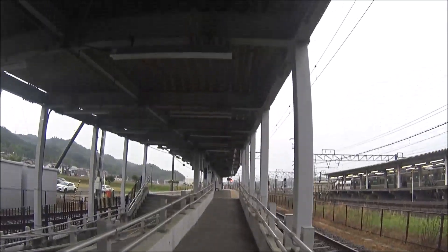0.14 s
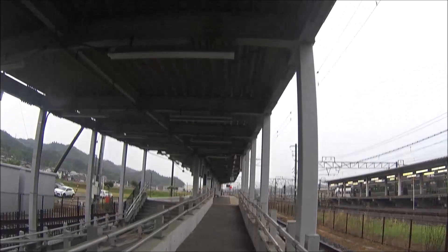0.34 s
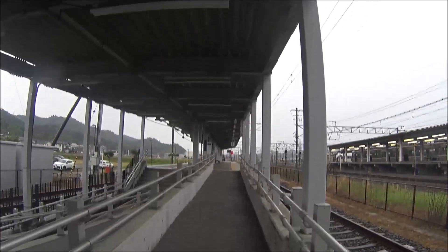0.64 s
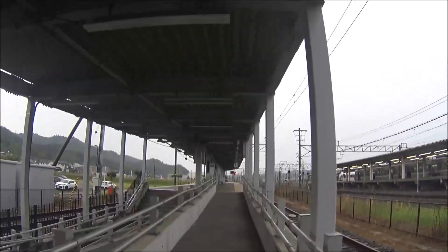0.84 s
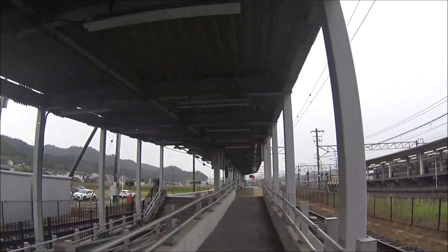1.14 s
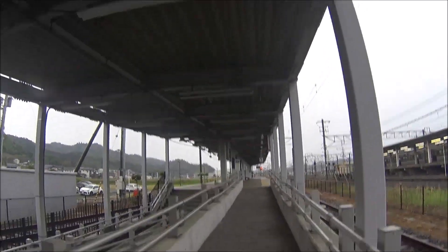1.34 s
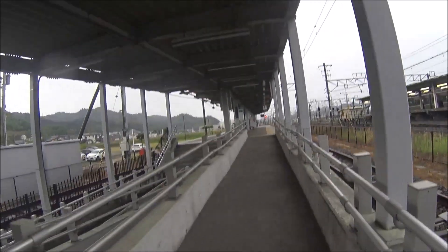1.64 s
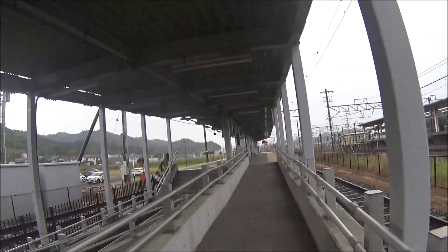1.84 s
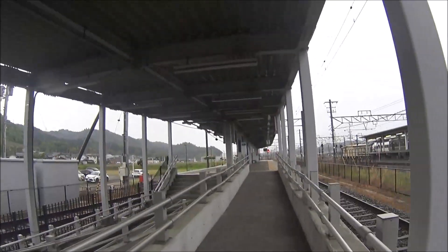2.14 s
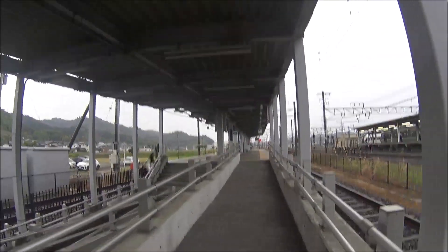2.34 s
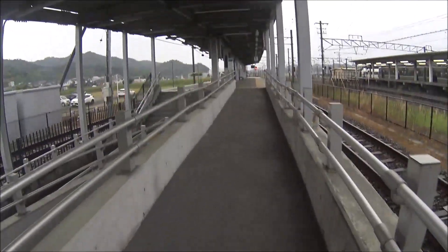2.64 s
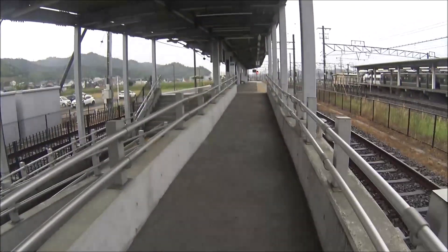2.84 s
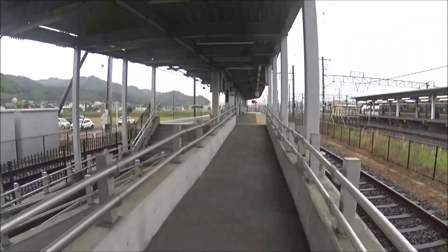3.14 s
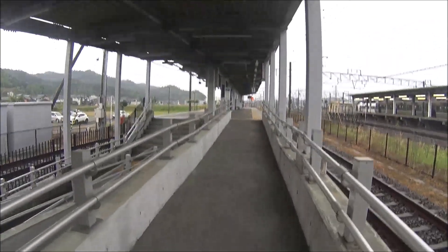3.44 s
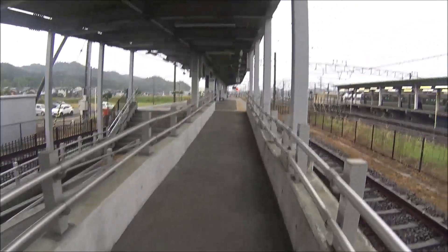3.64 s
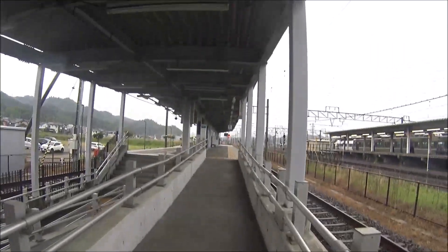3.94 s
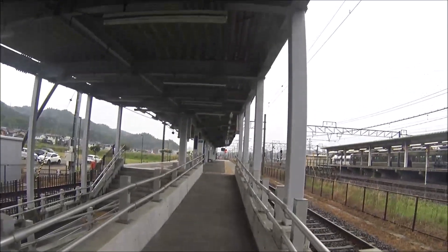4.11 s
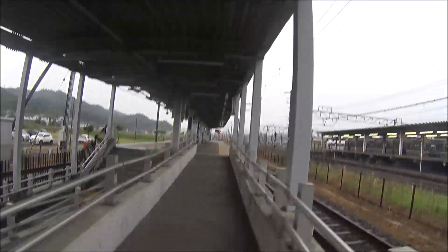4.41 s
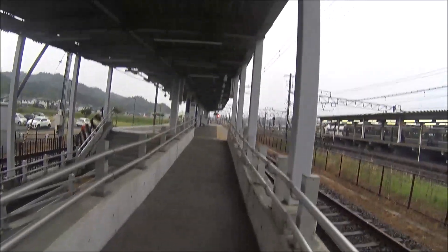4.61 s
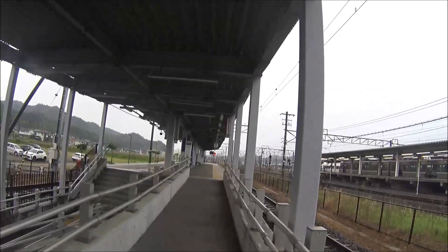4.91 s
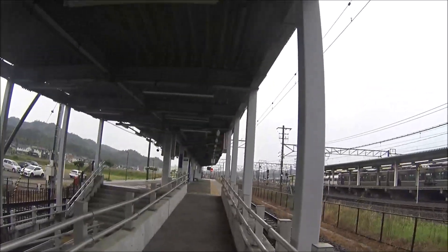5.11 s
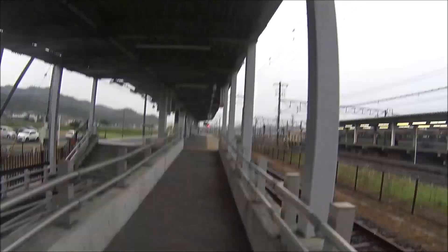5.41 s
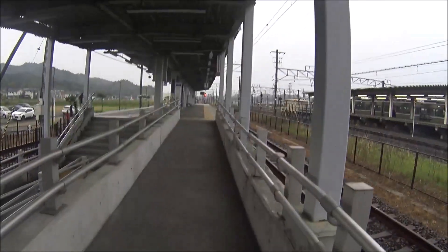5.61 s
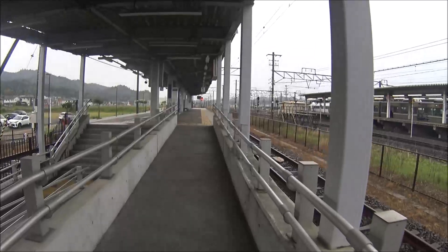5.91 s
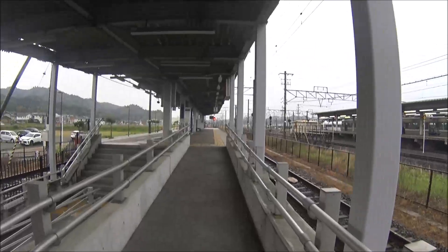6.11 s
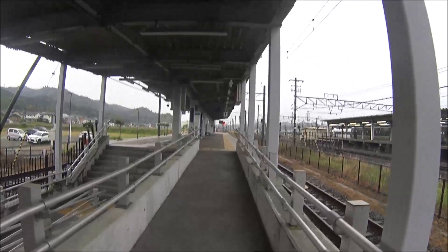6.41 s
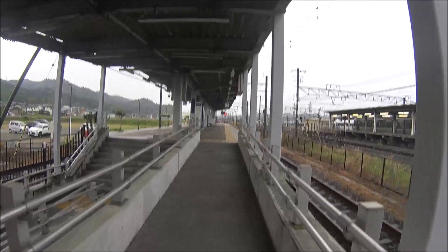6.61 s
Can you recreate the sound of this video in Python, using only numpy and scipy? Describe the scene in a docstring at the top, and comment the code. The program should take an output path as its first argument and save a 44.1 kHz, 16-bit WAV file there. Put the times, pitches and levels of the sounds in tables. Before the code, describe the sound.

A wheelchair rolls without stopping for almost seven seconds along a concrete ramp under a station roof, heard from a small camera riding on it. Close tyre hiss, grainy and slightly hollow, runs throughout, dipping a little near 2 s and a bit stronger from about 3 s. Beneath it is shuddering low rumble, modest at first, swelling from 3 s to its roughest around 3.5 to 4.5 s, then easing unevenly and rising slightly at the end. Faint, very short falling bird chips with a light roof echo come mostly between 0.6 and 2.7 s, then singly near 4.7, 5.7 and 6.3 s. A deep thud and tick fall at 1.7 s, hollow knocks cluster at 2.5 to 2.7, several between 3.1 and 4.5, again around 5.5 and at 6.6 s. Loose fittings tick at 3.6 to 4.5 s, sharpest on the right near 4.5, and again around 5.7, 6.0 and 6.7 s.

```python
"""Wheelchair on a platform ramp

Under a platform roof, a wheelchair rolls over concrete with a small camera and its two microphones aboard.
Tyres close by hiss over fine grit: grainy noise lifted by the resonances of the camera's housing.
Rough paving makes the frame rumble in shuddering low noise; wheels knock over bumps as struck modes and thuds.
Loose fittings tick with short rings, and a small bird chips faintly in quick falling sweeps with a roof echo."""
import sys
import numpy as np
from scipy import signal
from scipy.fft import rfft, irfft
from scipy.io import wavfile

SR = 44100
rng = np.random.default_rng(int(sys.argv[2]) if len(sys.argv) > 2 else 0)


def materialize(psi):
    """Save the field psi as 16-bit PCM at rate SR to the path in sys.argv[1].

    A 1-D psi becomes a single channel; in a 2-D psi each row is a channel.
    """
    bounded = np.clip(np.atleast_2d(psi).T, -1, 1)
    quanta = np.round(bounded * 32767).astype(np.int16)
    wavfile.write(sys.argv[1], SR, quanta)


N = 298116
TIME = np.arange(N) / SR
FREQ = np.maximum(np.arange(N // 2 + 1) * SR / N, 1)  # Hz, kept off zero for the logarithms
RING_TIME = TIME[:SR // 4]  # time axis of one struck sound, s


def undb(db):
    """Decibels to gain."""
    return 10 ** (np.asarray(db) / 20)


def unit(x):
    """Scale to rms 1."""
    return x / np.sqrt(np.mean(x ** 2))


def curves(table):
    """The columns of a table as controls over time, straight between rows."""
    seconds, *columns = np.transpose(table)
    return [np.interp(TIME, seconds, column) for column in columns]


def spectrum(points):
    """dB at every frequency, straight between points on a log axis."""
    hz, db = np.transpose(points)
    return np.interp(np.log(FREQ), np.log(hz), db)


def colour(x, db):
    """Filter by a dB value for every frequency."""
    return irfft(rfft(x) * undb(db), N)


def above(x, hz):
    """The part of a sound that lies above hz, with a smooth crossover."""
    return irfft(rfft(x) / (1 + (hz / FREQ) ** 6), N)


def walk(rate):
    """Smooth random drift of spread 1, up to about rate changes a second."""
    noise = rfft(rng.standard_normal(N))
    return unit(irfft(noise * np.exp(-(FREQ / rate) ** 2), N))


def decay(t60):
    """Exponential dying away by 60 dB in t60 seconds."""
    return np.exp(-np.log(1000) * RING_TIME / max(t60, 1 / SR))


def ring(hz, t60):
    """One struck mode: a decaying sine."""
    return np.sin(2 * np.pi * hz * RING_TIME) * decay(t60)


def add(track, s, sound):
    """Mix a sound into a track at s seconds."""
    start = int(max(s, 0) * SR)
    part = sound[..., :N - start]
    track[..., start:start + part.shape[-1]] += part


# Spread of the rolling sound between the two microphone ports.
# Each row: frequency in Hz, side filter (side minus mid) in dB.
PORT_WIDTH = [(30, -31), (110, -17), (250, -10), (500, -5.5), (850, -8), (1080, -13), (1280, -17.5),
              (1700, -12), (2150, -9), (2580, -16.5), (2960, -5.5), (3300, -14.5), (4700, -16), (6800, -11)]
# Balance of the two microphone ports.
# Each row: frequency in Hz, left minus right in dB.
PORT_BALANCE = [(60, -0.4), (1000, -0.7), (1280, -2.5), (1680, 0), (1890, -2), (2100, -3.5), (2800, 1),
                (3100, 2), (4300, 0.4), (10000, .3)]


def two_ports(mid, side):
    """Left and right: a shared sound plus a diffuse part of opposite sign at the two ports."""
    sign = np.array([[1], [-1]])
    diffuse = colour(side, spectrum(PORT_WIDTH))
    return colour(mid + sign * diffuse, sign * spectrum(PORT_BALANCE) / 2)


def texture(grain_rate, scatter_db, grain_db):
    """Contact force of rubber on concrete: smooth rubbing plus tiny impacts of uneven size."""
    struck = rng.random(N) < grain_rate / SR  # grain_rate: impacts per second
    grains = struck * rng.standard_normal(N)
    grains = grains * undb(scatter_db * np.minimum(rng.exponential(size=N), 4))
    return unit(rng.standard_normal(N) + undb(grain_db) * unit(grains))


# Pace of the chair, heard as the level of the tyres close to the microphones.
# Each row: time in seconds, tyre hiss level in dB before its small random drifts.
TYRE_PACE = [(0, -33), (1.4, -32.5), (1.8, -33), (1.97, -34.5), (2.35, -33), (3.0, -33.5), (3.17, -31.5),
             (3.87, -32.5), (4.02, -31), (5.0, -31.7), (5.4, -31), (6.76, -31)]
# Grain of the paving, heard in the treble of the tyres.
# Each row: time in seconds, treble over the hiss in dB before the trim and random drifts.
PAVING_GRAIN = [(0, -6.5), (1.35, -4), (2.4, -5.5), (4.0, -6), (6.3, -4.6), (6.76, -5)]
# Colour of the tyre hiss before the housing lifts it.
# Each row: frequency in Hz, relative density in dB per Hz.
HISS_COLOUR = [(30, -42), (200, -14), (385, -5), (470, -12.5), (850, -7.5), (1500, 1), (2150, -12.5),
               (2500, -6), (3200, -1), (4800, -0.5), (5500, -8.5), (7900, -10.5), (8700, -19),
               (10200, -30.5), (10900, -22)]
# Resonances of the camera's housing around the microphones.
# Each row: frequency in Hz, width in Hz, lift in dB.
HOUSING_MODES = [(1281.5, 219, 11), (1844, 137.3, 6.5), (2596, 643, 11.5), (3465, 75, 2.5), (6080, 110, 4)]


def tyres():
    """Tyre hiss over grit, lifted by the housing resonances; its treble follows the grain of the paving."""
    sway_db, flutter_db = 0.14, 0.35  # slow and quick drift of the whole hiss
    flicker_db, patch_db, treble_trim_db = 0.89, 0.29, 6.0  # quick and slow treble drift, fixed lift
    treble_hz = 3300
    [hiss_db], [treble_db] = curves(TYRE_PACE), curves(PAVING_GRAIN)

    shape = spectrum(HISS_COLOUR)
    for hz, width, lift_db in HOUSING_MODES:
        shape = shape + lift_db / (1 + (2 * (FREQ - hz) / width) ** 2)

    def rub():
        return unit(colour(texture(grain_rate=4000, scatter_db=1.5, grain_db=-6), shape))

    hiss = two_ports(mid=rub(), side=rub())
    treble = above(hiss, treble_hz)
    treble_gain_db = treble_db + treble_trim_db + flicker_db * walk(33) + patch_db * walk(5.3)
    hiss = hiss - treble + treble * undb(treble_gain_db)
    return hiss * undb(hiss_db + sway_db * walk(5.5) + flutter_db * walk(17))


# Roughness of the paving, felt through the frame that carries the camera.
# Each row: time in seconds, frame rumble level in dB before trim, judder and upper-bass growth.
PAVING_ROUGHNESS = [(0, -47), (.68, -52.5), (1.35, -47.5), (1.95, -49.5), (2.77, -50), (3.0, -44.5),
                    (3.55, -40), (4.15, -43), (4.5, -41), (4.9, -48.5), (5.5, -46), (5.82, -49.5),
                    (6.76, -44)]
# Colour of the frame rumble before its upper bass is adjusted.
# Each row: frequency in Hz, relative density in dB per Hz.
RUMBLE_COLOUR = [(12, 3), (25, -3), (47, 3.5), (70, -0.5), (95, -3), (120, -2.5), (160, -7.5), (220, -10.5),
                 (300, -14.5), (400, -16.5), (700, -16.5), (1200, -36), (3000, -73)]


def frame():
    """Uneven paving shakes the frame in short judders; the rougher it is, the more the upper bass joins in."""
    judder_db, trim_db = 1.27, 2
    smooth_db, rattle_growth, split_hz = -45, 0.2, 85  # growth: upper-bass dB per dB of rumble over smooth_db
    [rumble_db] = curves(PAVING_ROUGHNESS)

    def shake():
        return unit(colour(texture(grain_rate=250, scatter_db=0.5, grain_db=-2), spectrum(RUMBLE_COLOUR)))

    shakes = two_ports(mid=shake(), side=shake())
    upper = above(shakes, split_hz)
    shakes = shakes - upper + upper * undb(rattle_growth * (rumble_db - smooth_db))
    return shakes * undb(rumble_db + trim_db + judder_db * walk(12))


# Chips of a small bird, faint under the platform roof.
# Each row: start in seconds, peak level of the direct sweep in dB.
BIRD_CHIPS = [(.637, -37), (.706, -39), (1.212, -39), (1.291, -40), (1.348, -33), (1.605, -35),
              (1.627, -36), (2.324, -36), (2.360, -39), (2.652, -37), (4.661, -37), (5.656, -36),
              (6.346, -37)]


def birds():
    """A small bird gives thin chips, each a quick downward sweep with a short echo off the roof."""
    start_hz, end_hz, chip_s = 10800, 5700, 0.013
    roof_db, roof_t60 = -7, 0.084  # echo energy against the direct chip, decay in s
    direct = np.zeros(N)
    progress = np.linspace(0, 1, int(chip_s * SR))
    sweep_hz = start_hz * (end_hz / start_hz) ** progress
    phase = 2 * np.pi * np.cumsum(sweep_hz) / SR
    swell = np.sin(np.pi * progress ** 2) ** 2  # loudest past the middle
    for s, db in BIRD_CHIPS:
        add(direct, s, undb(db) * swell * np.sin(phase))
    echo = rng.standard_normal((2, len(RING_TIME))) * decay(roof_t60)
    echo = undb(roof_db) * echo / np.sqrt(np.sum(echo[0] ** 2))
    return direct + signal.fftconvolve(direct[None], echo)[:, :N]


# Bumps under the wheels, close below the microphones and equal in both.
# Each row: start in seconds, knock level in dB, lower mode in Hz, upper mode in Hz,
# thud level in dB, thud pitch in Hz.
WHEEL_BUMPS = [(1.712, -43, 300, 500, -26.5, 42), (2.511, -35, 374, 710, -45, 90),
               (2.541, -34.5, 325, 740, -44, 90), (2.665, -35, 412, 670, -46, 90),
               (2.680, -35.5, 410, 534, -37, 55), (3.110, -38, 298, 623, -50, 100),
               (3.38, -52, 260, 450, -31, 88.4), (3.591, -45, 280, 500, -31, 115),
               (3.648, -34.5, 248, 430, -35, 109), (3.724, -41, 260, 470, -33, 100),
               (3.983, -52, 282, 480, -28, 56.5), (4.41, -41.5, 270, 443, -30, 105),
               (4.546, -42, 260, 447, -30.5, 90), (5.433, -33, 337, 610, -34, 65),
               (5.531, -35.5, 300, 530, -31, 115), (5.557, -34.5, 318, 550, -30, 116),
               (6.572, -31, 378, 558, -31, 101)]


def bumps():
    """A wheel drops over a bump: a scuffing contact rings two hollow modes, and the frame thuds."""
    scuff_db, scuff_s = -7, 0.027  # scuff against the first impact, and its decay time
    knock_t60, thud_t60 = 0.059, 0.12  # s
    out = np.zeros(N)
    for s, knock_db, low_hz, high_hz, thud_db, thud_hz in WHEEL_BUMPS:
        scuff = rng.standard_normal(len(RING_TIME)) * np.exp(-RING_TIME / scuff_s)
        contact = undb(scuff_db) * scuff / np.sqrt(scuff_s * SR / 2)  # scuff brought to unit energy
        contact[0] += 1  # the first impact
        wheel = ring(low_hz, knock_t60) - ring(high_hz, knock_t60)
        knock = signal.fftconvolve(contact, wheel)[:len(RING_TIME)]
        thud = ring(thud_hz, thud_t60)
        add(out, s, undb(knock_db) * knock + undb(thud_db) * thud)
    return out


# Ticks of loose fittings, placed to the left or right of the microphones.
# Each row: start in seconds, level in dB before the mode levels, pitch in Hz, left minus right in dB.
FITTING_TICKS = [(1.758, -15, 1880, -2.5), (3.5638, -18, 1840, 12), (3.9744, -19, 1640, -10),
                 (4.0083, -18.5, 1860, -15), (4.0387, -19.5, 1640, -10), (4.0881, -22, 1750, 14),
                 (4.313, -17.5, 1780, -11), (4.4731, -7, 2670, -13), (4.5199, -17, 1770, 11),
                 (5.653, -17, 1860, 5), (5.684, -20, 1870, -2), (5.9755, -12, 2700, -2),
                 (6.699, -20, 1910, -14)]
# Modes of one fitting.
# Each row: multiple of the tick's pitch, level in dB, share of the ring time.
FITTING_MODES = [(.7, -12, 0.88), (1, -4, 0.92), (1.3, -7.5, .5)]


def fittings():
    """Loose parts tick against each other: three modes ring briefly, dying sooner at higher pitch."""
    contact_s = 0.00019
    ring_cycles = 26.3  # cycles of the pitch in a full 60 dB ring time, before each mode takes its share
    out = np.zeros((2, N))
    attack = 1 - np.exp(-(RING_TIME / contact_s) ** 2)  # contact builds up over a fraction of a cycle
    for s, db, hz, pan_db in FITTING_TICKS:
        t60 = ring_cycles / hz
        modes = sum(undb(mode_db) * ring(hz * ratio, t60 * share) for ratio, mode_db, share in FITTING_MODES)
        port_db = db + np.array([[pan_db], [-pan_db]]) / 2
        add(out, s, undb(port_db) * attack * modes)
    return out


def scene():
    """The rolling sounds ride with the chair, so nothing moves across the stereo field."""
    return tyres() + frame() + birds() + bumps() + fittings()


def record(dry):
    """The camera drops the deepest bass and cuts off the top steeply."""
    bass_hz, top_hz = 18, 11100
    dry = signal.sosfilt(signal.butter(2, bass_hz, "high", fs=SR, output="sos"), dry)
    return signal.sosfilt(signal.ellip(14, .1, 90, top_hz, fs=SR, output="sos"), dry)


dry = scene()
out = record(dry)
materialize(out)
```